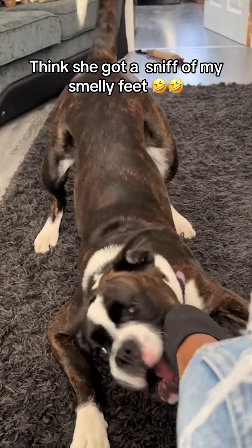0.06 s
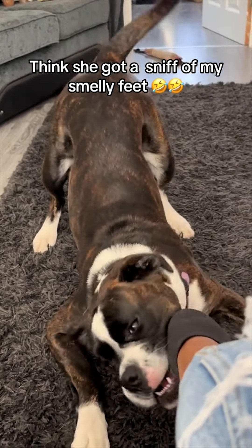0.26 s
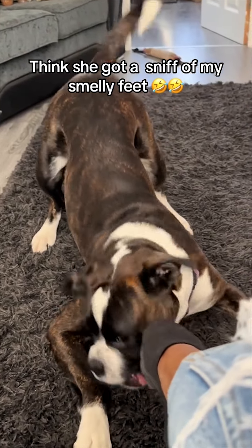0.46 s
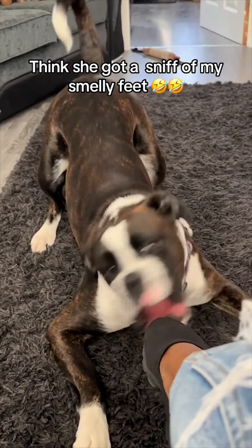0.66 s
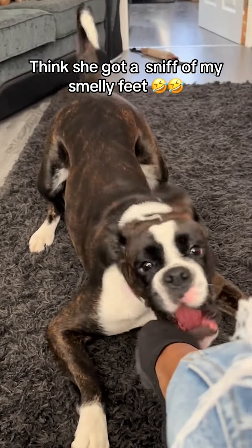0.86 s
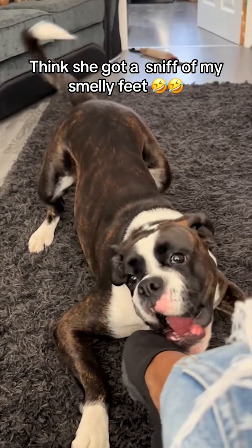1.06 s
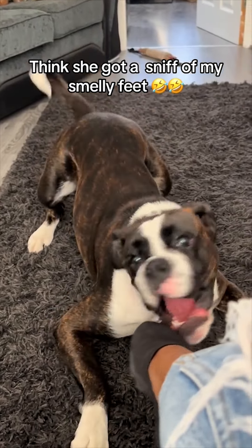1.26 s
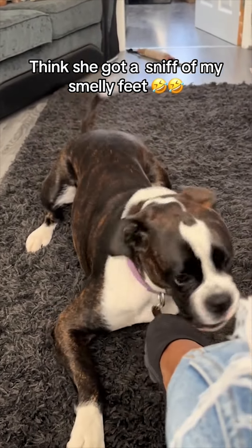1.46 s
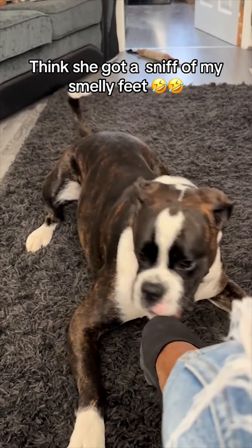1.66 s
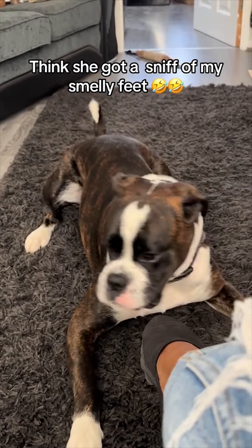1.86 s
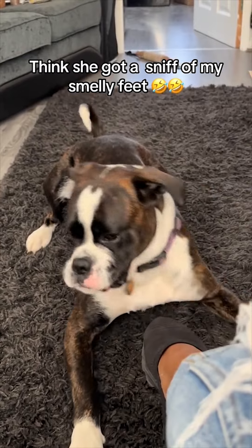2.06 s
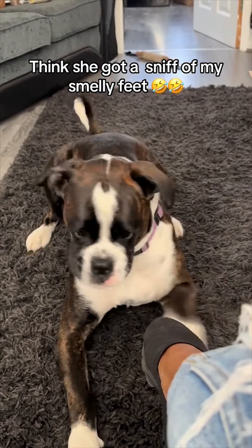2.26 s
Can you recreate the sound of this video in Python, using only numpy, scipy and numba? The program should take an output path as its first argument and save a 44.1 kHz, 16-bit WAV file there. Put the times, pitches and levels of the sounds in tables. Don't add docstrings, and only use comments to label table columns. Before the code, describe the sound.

A large dog play-growls very close in a soft, dry living room. A growl trails off with two tiny collar ticks by 0.1 s; a deep, fluttering, raspy growl swells from 0.2 s and runs into a grumble until 1.1 s. A short breathy pant follows, then a rough snarl from 1.3 s, fading after 1.65 s. Soft sniffs, faint room hiss, a dull tick and a weak mutter end it near 2.3 s.

```python
import sys
import numpy as np
from scipy import signal
from scipy.fft import rfft, irfft, next_fast_len
from scipy.io import wavfile
from numba import njit

SR = 44100
rng = np.random.default_rng(int(sys.argv[2]) if len(sys.argv) > 2 else 0)


def gain_from_db(level_db):
    decades = np.asarray(level_db, float) / 20
    return 10 ** decades


def pcm_store(signal):
    levels = np.round(np.clip(np.atleast_2d(signal), -1, 1) * 32767)
    wavfile.write(sys.argv[1], SR, levels.astype(np.int16).T)


N = 101429

# time in seconds, rate in Hz.
FLAP_RATE = [(0, 86.35), (.2, 107.7), (.25, 99.08), (.32, 95.9), (.48, 95.67), (.54, 98.33), (.65, 97.7),
             (.72, 92.98), (.79, 86.89), (1, 87.64), (1.1, 84.73), (1.14, 76.27), (1.3, 77.97),
             (1.35, 85.22), (1.6, 84.5), (1.66, 78.97), (1.85, 80.02), (2.3, 111.1)]
# time in seconds, chest level in dB, rasp over chest in dB,
# throat resonance in Hz, mouth opening in dB.
FADING_GROWL = [
    (0.0, -38, 4.5, 1000, 1.5),
    (0.046, -47, -1, 1070, -2.5),
    (0.088, -57, 6, 950, 3),
    (0.16, -61.5, 6, 890, 5),
    (0.185, -66.5, 4, 985, -14),
]
BITING_GROWL = [
    (0.197, -47, 13.5, 703, -6),
    (0.238, -27, -9.5, 1060, -9),
    (.341, -21, -7.5, 1031, -17.5),
    (0.423, -21, -9, 1109, -54.5),
    (0.451, -17, -41.5, 703, -46.5),
    (.485, -22.5, -15.5, 630, -26.5),
    (.533, -22.5, -22, 620, -29),
    (.577, -22.5, -5.5, 790, -20.5),
    (0.629, -27, -13, 970, -14.5),
]
GRUMBLE = [
    (0.647, -23.5, -3.5, 964, -39),
    (0.662, -21.5, -6, 850, -17.5),
    (0.718, -21.5, -4.5, 918, -23),
    (0.781, -29, -4, 920, -22),
    (0.854, -20, -14, 928, -41),
    (.91, -21.5, -10, 867, -32),
    (0.949, -21.5, -8, 890, -34),
    (1.014, -23.5, -2.5, 835, -26),
    (1.092, -31.5, -9, 994, -5),
    (1.123, -67, -12, 945, 5),
]
PANT = [
    (1.139, -46, 0, 825, -14),
    (1.16, -39, -4.5, 798, -2.5),
    (1.186, -33.5, -3, 782, -6),
    (1.198, -31.5, -11, 770, -34),
    (1.222, -44, -1, 800, 8),
    (1.277, -65, 21.5, 820, -18),
    (1.287, -74.5, 17.5, 866, -7),
]
SNARL = [
    (1.296, -34.5, 5, 760, -22),
    (1.333, -22.5, 4, 746, -24),
    (1.369, -24.5, -1.5, 704, -17.5),
    (1.419, -26, -5.5, 850, -22),
    (1.498, -27, -7.5, 890, -35),
    (1.614, -25, -13.5, 890, -34.5),
    (1.65, -38, -20, 690, -32),
    (1.77, -51.5, -19.5, 744, -39),
    (1.825, -59, -31, 824, -50),
    (1.86, -83, 10, 974, -5),
]
MUTTER = [
    (2.05, -92, -7, 890, -2),
    (2.17, -71.5, -6.5, 890, -22.5),
    (2.26, -58, -9, 644, -5),
    (2.285, -48.5, -32, 615, -25),
    (2.3, -52.5, -1, 640, -27),
]
# centre in Hz, width in Hz, level in dB.
CHEST = [(138.4, 12.4, -5), (196.2, 52, -13.5), (241, 28.6, -8), (426.5, 63, -16), (614, 205, -15)]
# centre in Hz, width in Hz, level in dB.
THROAT = [(530, 54, -9.5), (649.4, 66, -5), (890, 220, -11.5), (1265, 150, -12)]
# centre in Hz, width in Hz, level in dB.
MOUTH = [(1440, 284, 1), (2005, 161, -2), (2275, 110, -5), (3025, 115, -7), (3660, 510, -7),
         (4740, 440, -17.5)]
# frequency in Hz, level in dB.
TEETH_HISS = [(1500, -4.5), (3500, 0.5), (5500, -0.5), (7500, -1), (10000, -7.5), (11800, -21.5),
              (13000, -58), (15500, -54.5)]
# centre in seconds, length in seconds, level in dB.
SNIFFS = [
    (1.669, 0.072, -47.5),
    (1.746, 0.026, -64.5),
    (1.906, 0.11, -60.5),
    (2.093, 0.05, -71.5),
]
# centre in Hz, width in Hz, level in dB.
NOSE = [(1126, 460, -6.5), (3900, 270, 1.5), (7660, 2400, -4), (9500, 890, -12.5), (14400, 1500, -19)]
# start in seconds, level in dB, ring in Hz.
TAG_TICKS = [
    (0.025, -46, 5630),
    (0.069, -45.5, 5220),
    (2.232, -54, 2700),
]
# frequency in Hz, level in dB.
ROOM_HISS = [(30, 1), (90, -13.5), (300, -15), (1500, -20), (3800, -20), (5500, -38.5), (7600, -14),
             (9000, -37.5), (11500, -43.5), (12500, -69.5)]
# time in seconds, peak in dB.
CATCHES = [(0.206, -29.5), (0.251, -14.5), (0.271, -26), (0.308, -12.5), (0.423, -20.5), (0.536, -24),
           (0.569, -33), (0.7, -18), (0.881, -22), (0.983, -18), (1.011, -29.5), (1.039, -25),
           (1.061, -30.5), (1.163, -20), (1.18, -22.5), (1.3, -15.5), (1.328, -10), (1.361, -11.5),
           (1.514, -26.5), (2.278, -45.5)]
# time in seconds, level against the folds in dB.
RATTLE = [(0, 3.5), (.2, 2.5), (.3, 3), (.45, -2.5), (.5, 6.5), (.6, 4.5), (.75, -4.5), (.81, 1.5),
          (.86, -7.5), (.97, -3), (1.05, -2.5), (1.2, 0), (1.35, -5), (1.48, 0.5), (1.56, 3), (1.66, -2.5),
          (1.83, -1.5), (2.22, 0.5), (2.28, 4)]
# centre in seconds, depth in dB (below zero the tone swells),
# length in seconds.
STUMBLES = [(0.269, 12, 0.0067), (0.34, 14, 0.0071), (0.388, 1.5, .02), (0.475, 16.5, 0.014),
            (0.57, 2.5, 0.0097), (.588, -3, 0.018), (0.62, 1.5, 0.018), (0.67, 29, 0.014),
            (0.866, 2.5, 0.048), (0.887, 7, 0.032), (1.402, 22.5, 0.0067), (1.448, 31, 0.0081),
            (1.549, 10, 0.016)]
# start in seconds, peak in dB, dying time in seconds, brightness in dB.
GUSTS = [(0.19, -45.5, 0.015, 4), (0.2033, -34, 0.0094, -23.5), (0.2267, -30.5, 0.014, -6),
         (0.264, -25, 0.017, 9), (0.3, -58.5, 0.017, -28), (0.3285, -21.5, 0.014, -24),
         (0.3694, -31, 0.034, -1), (0.555, -31, 0.017, 13.5), (0.569, -35, 0.045, 9), (0.6, -30, 0.019, 11),
         (0.6517, -19.5, 0.011, 1.5), (0.696, -20, 0.005, 17), (0.7476, -31.5, 0.0089, 16.5),
         (0.8818, -59, 0.017, 10), (0.934, -41.5, 0.045, 2), (0.965, -40.5, 0.036, 3.5),
         (1.026, -38, 0.028, 11), (1.1566, -29.5, 0.015, 3.5), (1.2245, -41.5, 0.024, -2),
         (1.294, -37, 0.021, -7), (1.3135, -33.5, 0.021, -20.5), (1.3287, -34, 0.034, -17.5),
         (1.3622, -22.5, 0.018, 0), (1.4026, -32.5, 0.017, 2), (1.439, -48, 0.038, 1.5)]
# centre in Hz, width in Hz, level in dB.
GUST_MOUTH = [(1600, 190, -3.5), (2054, 294, 0.5), (2442, 266, 0), (3020, 270, -8)]
# time in seconds, level against the folds in dB.
TOP_AIR = [(0, -37), (.1, -52), (.4, -65), (.46, -55.5), (.78, -52), (1.08, -58.5), (1.17, -36),
           (1.25, -67), (1.6, -71), (2.2, -70), (2.25, -33)]


def rms_one(x):
    return x / np.sqrt(np.mean(x ** 2) + 1e-20)


def in_time(rows):
    s, *columns = np.transpose(rows)
    return [np.interp(np.arange(N) / SR, s, c) for c in columns]


def drift(rate_hz):
    r = np.exp(-2 * np.pi * rate_hz / SR)
    noise = rng.standard_normal(N + SR)
    return rms_one(signal.lfilter([1], [1, -2 * r, r * r], noise)[SR:])


def coloured(points):
    hz, db = np.transpose(points)
    grid = np.arange(1, N // 2 + 2) * SR / N
    shape = gain_from_db(np.interp(np.log(grid), np.log(hz), db))
    return rms_one(irfft(rfft(rng.standard_normal(N)) * shape, N))


def cut(x, hz, kind, order):
    return signal.sosfilt(signal.butter(order, hz, kind, fs=SR, output="sos"), x)


@njit
def sweep(x, cosine, r):
    y = np.zeros(len(x))
    for i in range(2, len(x)):
        y[i] = x[i] - x[i - 2] + 2 * r * cosine[i] * y[i - 1] - r * r * y[i - 2]
    return y


def resonances(x, table):
    out = np.zeros(len(x))
    for k, (hz, wide_hz, db) in enumerate(table):
        cosine = np.cos(2 * np.pi * hz / SR) + 0 * x
        ring = sweep(x, cosine, np.exp(-np.pi * wide_hz / SR))
        out += (-1) ** k * gain_from_db(db) * rms_one(ring)
    return out


def chest_tone(turns):
    t = np.arange(N) / SR
    wave = np.cos(2 * np.pi * turns) + gain_from_db(-13.5) * np.cos(4 * np.pi * turns)
    tone = rms_one(gain_from_db(0.8 * drift(35)) * wave)
    dip_db = sum(db * np.exp(-(2 * (t - s) / length) ** 2) for s, db, length in STUMBLES)
    return gain_from_db(1) * tone * gain_from_db(-dip_db)


def flaps(turns):
    strength = gain_from_db(2.4 * rng.standard_normal(N // 100))[turns.astype(int)]
    kicks = rms_one(np.diff(np.floor(turns), prepend=0) * strength)
    rest, sharpness, lag_turns = 0.46, 1.15, 0.19
    opening = np.exp(sharpness * (np.cos(2 * np.pi * (turns - lag_turns)) - 1))
    gate = strength * (rest + opening)
    breath = rms_one(gate * rng.standard_normal(N))
    breath_share = 0.28
    folds = np.sqrt(1 - breath_share) * kicks + np.sqrt(breath_share) * breath
    return folds, breath, gate


def chest_rattle(folds, breath):
    body = cut(resonances(folds + 0.84 * breath, CHEST), 600, "low", order=3)
    return gain_from_db(in_time(RATTLE)[0]) * gain_from_db(-1) * body


def throat_rasp(folds, rasp_db, throat_hz, open_db):
    t = np.arange(N) / SR
    catch = sum(gain_from_db(db - 2) * (t >= s) * np.exp(-np.abs(t - s) / 0.0059) for s, db in CATCHES)
    rasp = gain_from_db(rasp_db) * folds + catch * rng.standard_normal(N)
    throat = resonances(rasp, THROAT) + resonances(rasp, [(throat_hz, 84, -4.5)])
    jaws = np.clip(np.maximum((throat_hz - 930) / 120, (open_db + 30.5) / 12), 0, 1)
    wide = cut(throat, 1400, "low", order=8)
    narrow = cut(throat, 1060, "low", order=8)
    throat = jaws * wide + (1 - jaws) * narrow
    return np.std(rasp) * cut(throat, 714, "high", order=2)


def mouth_breath(breath, throat_hz):
    puffs = breath * gain_from_db(-7.5 + 0.88 * drift(19))
    lift_hz = np.maximum(throat_hz - 900, 0)
    mouth = np.zeros(N)
    for hz, wide_hz, db in MOUTH:
        centre_hz = hz + lift_hz * (hz > 2200)
        ring = resonances(puffs, [(centre_hz, wide_hz, 0)])
        mouth += resonances(ring, [(centre_hz, 3 * wide_hz, db)])
    return cut(np.std(puffs) * mouth, 10000, "low", order=3)


def teeth_hiss(gate, open_db):
    return gain_from_db(-31 + 0.22 * (open_db + 26.5)) * rms_one((gate + 0.5) * coloured(TEETH_HISS))


def top_air():
    air = rms_one(cut(rng.standard_normal(N), [13300, 15700], "band", order=4))
    return gain_from_db(in_time(TOP_AIR)[0] + 2 * drift(5)) * air


def dog():
    lull = [(1.9, -63.5, 0.0055, 780, -1.6)]
    voice = FADING_GROWL + BITING_GROWL + GRUMBLE + PANT + SNARL + lull + MUTTER
    level_db, rasp_db, throat_hz, open_db = in_time(voice)
    turns = np.cumsum(in_time(FLAP_RATE)[0] * (1 + 0.03 * drift(44)) / SR)
    folds, breath, gate = flaps(turns)
    voiced = chest_tone(turns) + chest_rattle(folds, breath)
    voiced = voiced + gain_from_db(open_db) * mouth_breath(breath, throat_hz)
    voiced = voiced + teeth_hiss(gate, open_db) + top_air()
    throat = throat_rasp(folds, level_db + rasp_db, throat_hz, open_db)
    bursts = gusts((gate + 0.55) * rng.standard_normal(N))
    return cut(throat + bursts + gain_from_db(level_db) * voiced, 70.1, "high", order=8)


def room_hiss():
    return gain_from_db(-66 + 1.8 * drift(13.0)) * coloured(ROOM_HISS)


def rumble():
    return gain_from_db(-67.5) * rms_one(cut(rng.standard_normal(N), [25, 65], "band", order=2))


def tag():
    t = np.arange(N) / SR
    t60_s = 0.019
    return sum(gain_from_db(db - 60 * np.abs(t - s) / t60_s) * (t > s) * np.sin(2 * np.pi * hz * t)
               for s, db, hz in TAG_TICKS)


def gusts(breath):
    t = np.arange(N) / SR
    low = rms_one(resonances(breath, [(hz, 1.6 * wide_hz, db) for hz, wide_hz, db in GUST_MOUTH]))
    high = rms_one(resonances(breath, [(hz, 3.2 * wide_hz, db) for hz, wide_hz, db in MOUTH[4:]]))
    attack_s, level_db = 0.0016, -9
    out = np.zeros(N)
    for s, db, dying_s, bright_db in GUSTS:
        age = np.clip(t - s, 0, 0.3)
        swell = (1 - np.exp(-age / attack_s)) * np.exp(-age / max(dying_s, 0.004))
        out += gain_from_db(db + level_db) * swell * (low + gain_from_db(bright_db - 14.5) * high)
    return cut(cut(out, 950, "high", order=3), 6500, "low", order=3)


def sniffs():
    t = np.arange(N) / SR
    shape = sum(gain_from_db(db) * np.exp(-(2 * (t - s) / length) ** 2) for s, length, db in SNIFFS)
    return shape * gain_from_db(0.62 * drift(52)) * rms_one(resonances(rng.standard_normal(N), NOSE))


def room(x):
    t60_s, wall_cut_hz = 0.24, 8600
    size = next_fast_len(N + SR)
    w = 2 * np.pi * np.arange(size // 2 + 1) / size
    dull = 1 / (1 + 1j * w * SR / (2 * np.pi * wall_cut_hz))
    out = [0, 0]
    for k, lag_s in enumerate(rng.uniform(0.008, 0.03, 16)):
        loop = gain_from_db(-60 * lag_s / t60_s) * dull * np.exp(-1j * w * lag_s * SR)
        out[k % 2] = out[k % 2] + (-1) ** (k // 2) * loop / (1 - loop)
    return irfft(np.array(out) * rfft(x, size), size)[:, :N]


def scene():
    near = dog() + room_hiss() + tag() + sniffs()
    left, right = room(near)
    side = gain_from_db(-25) * cut(left - right, [330, 1300], "band", order=5)
    side = side + gain_from_db(-18.5) * cut(left - right, 5770, "high", order=7)
    side = side + gain_from_db(-12) * np.roll(cut(near, 10500, "high", order=6), 300)
    mid = near + gain_from_db(-12.5) * cut(left + right, 118, "high", order=2) / 2 + rumble()
    return np.array([mid + side, mid - side])


def roll_off(x):
    return signal.sosfilt(signal.butter(12, 15710, fs=SR, output="sos"), x)


def record(dry):
    notched = cut(dry, [11300, 13200], "bandstop", order=4)
    mix = cut(notched, 15600, "low", order=12)
    return roll_off(mix)


dry = scene()
out = record(dry)
pcm_store(out)
```